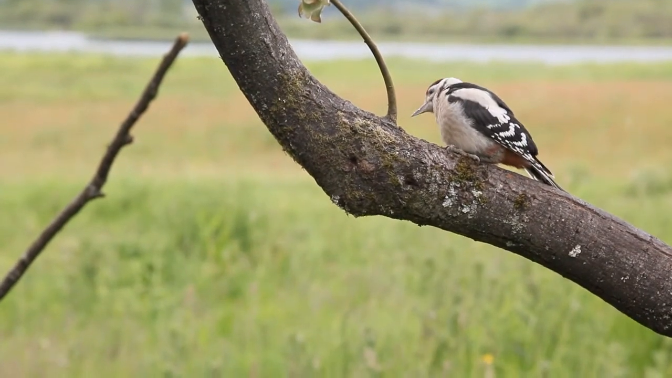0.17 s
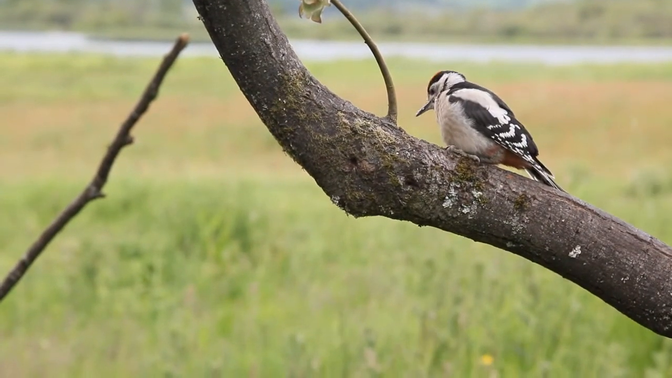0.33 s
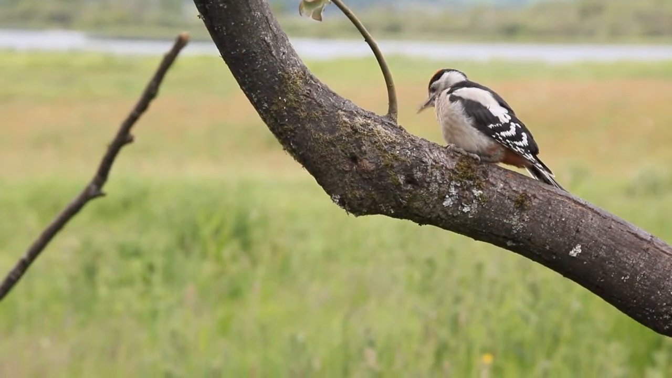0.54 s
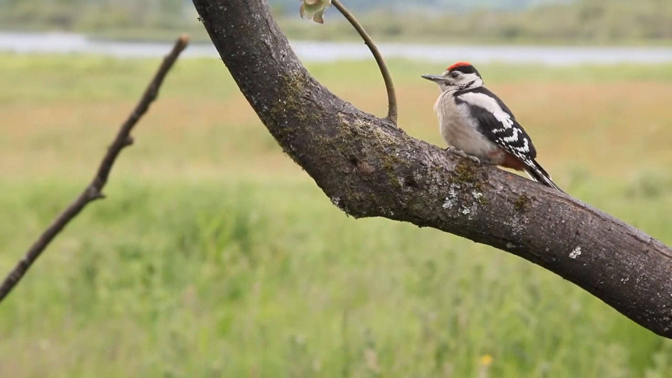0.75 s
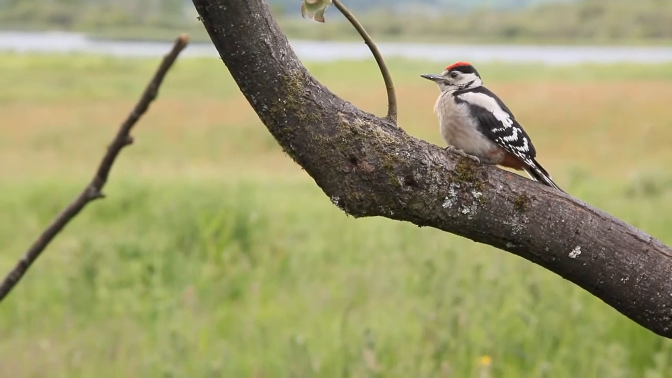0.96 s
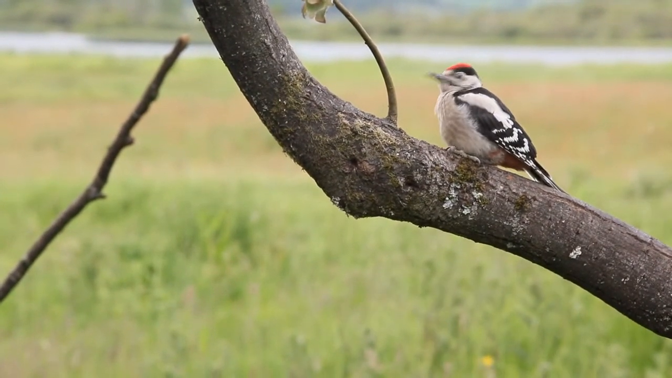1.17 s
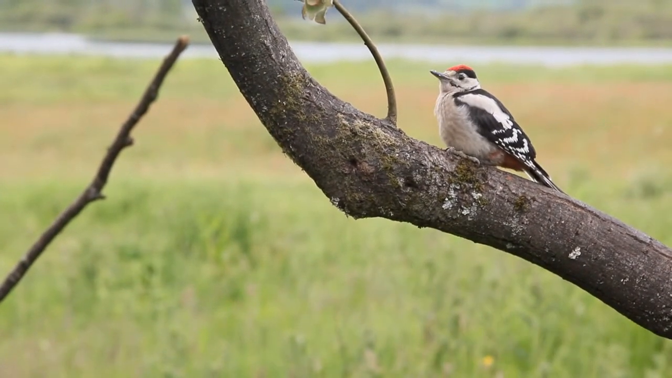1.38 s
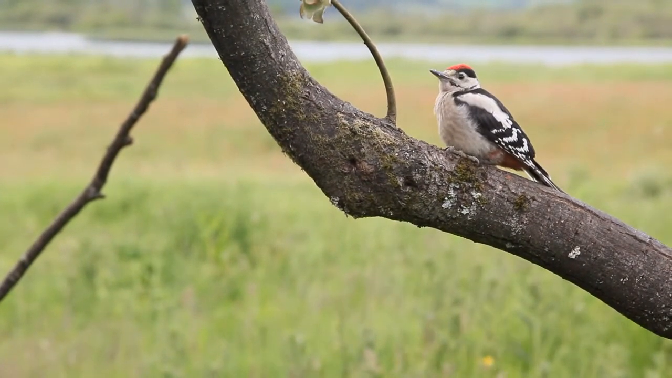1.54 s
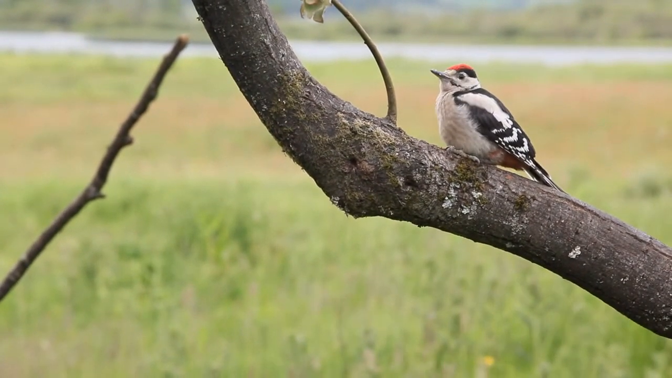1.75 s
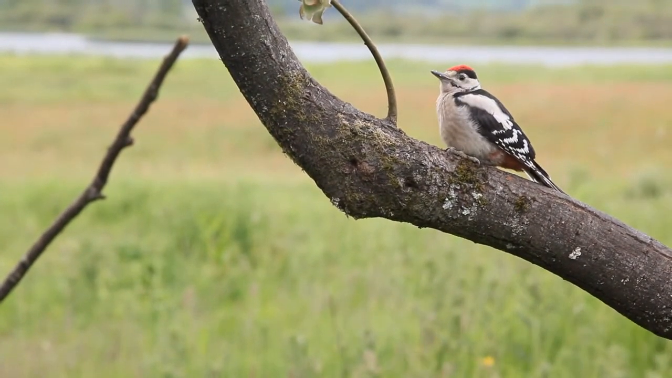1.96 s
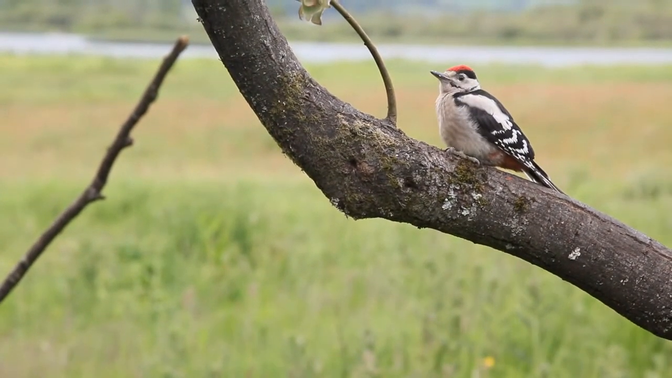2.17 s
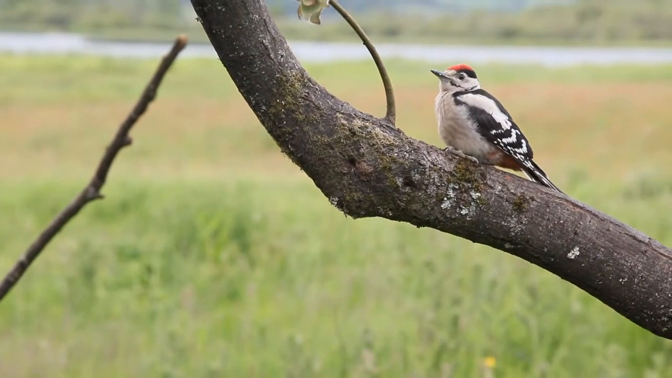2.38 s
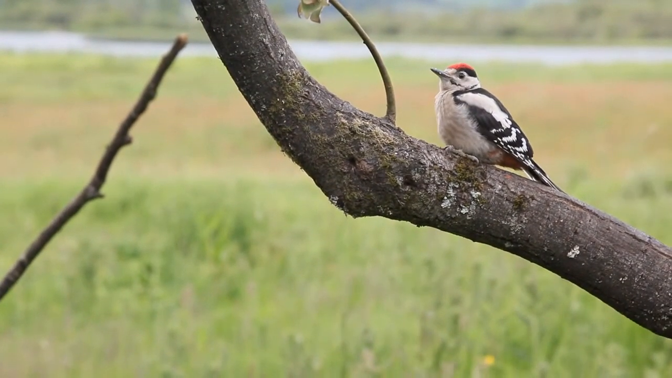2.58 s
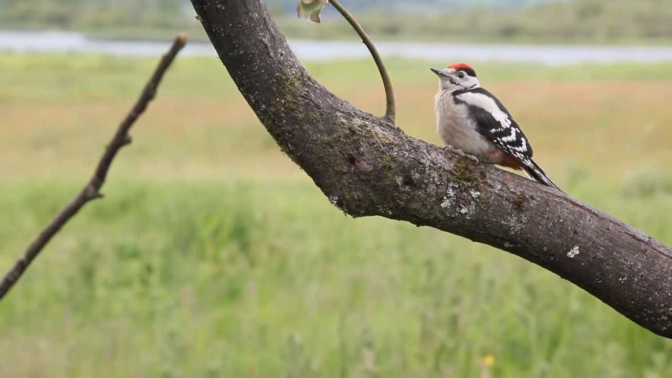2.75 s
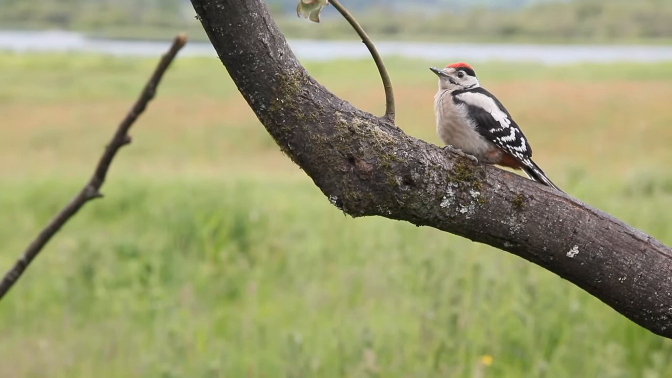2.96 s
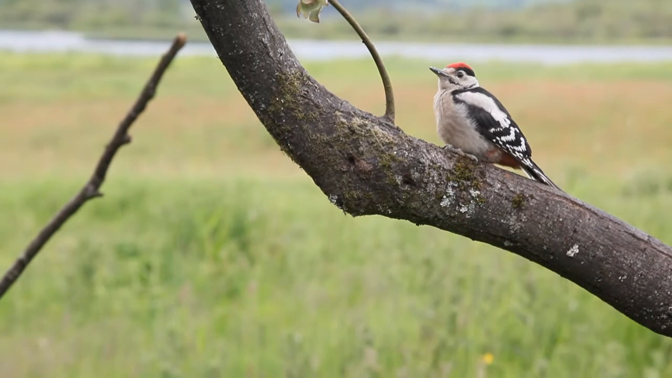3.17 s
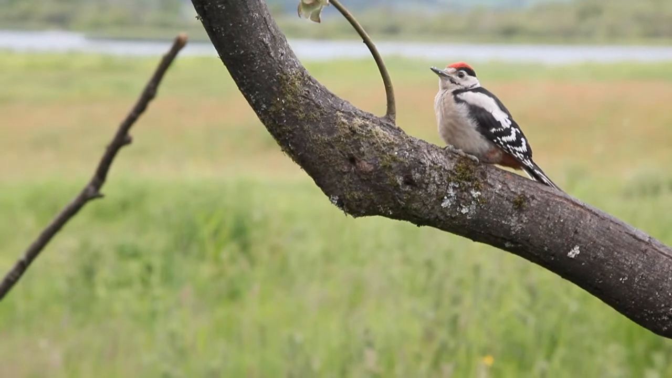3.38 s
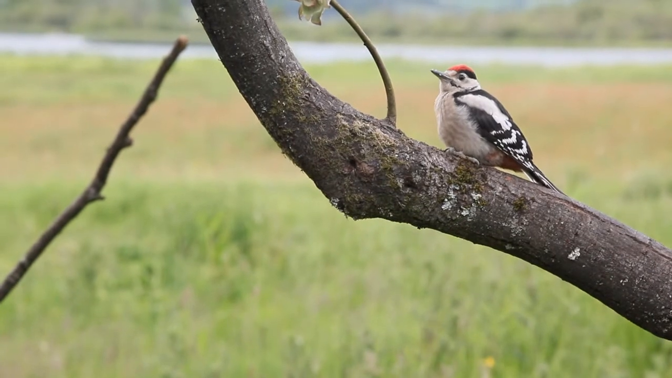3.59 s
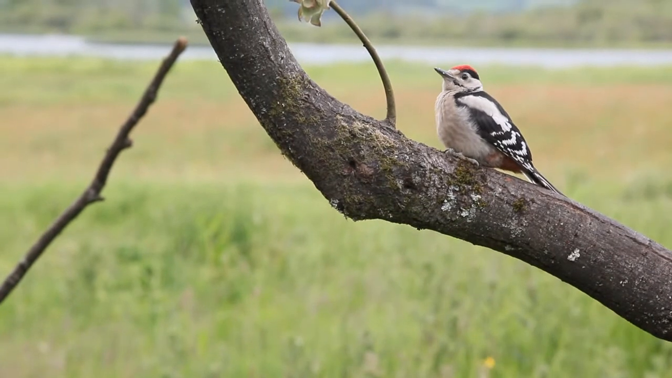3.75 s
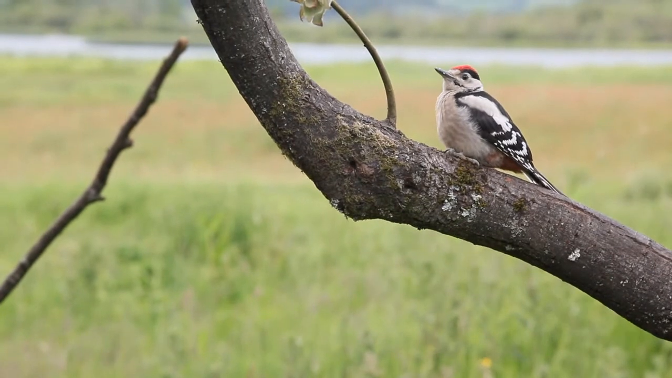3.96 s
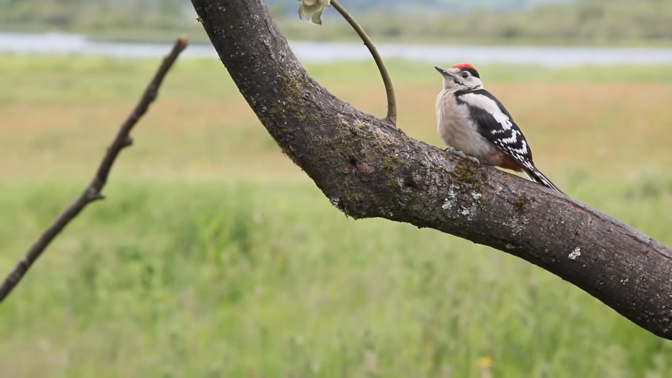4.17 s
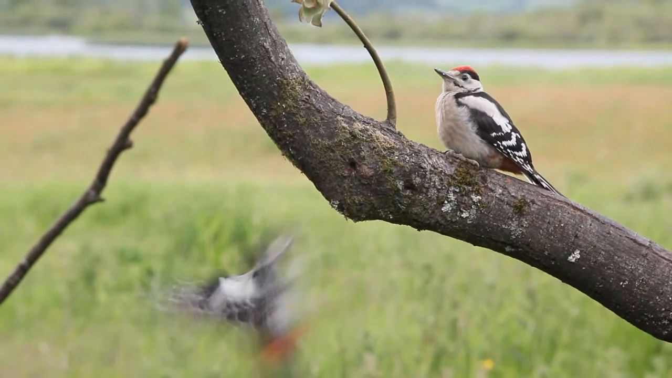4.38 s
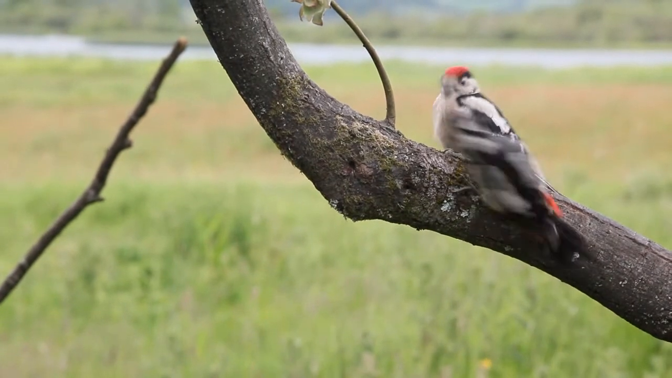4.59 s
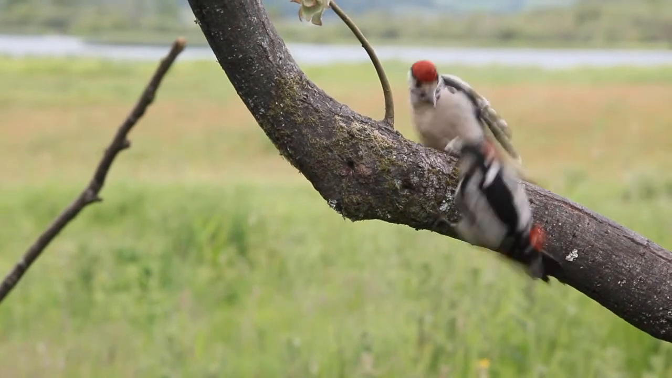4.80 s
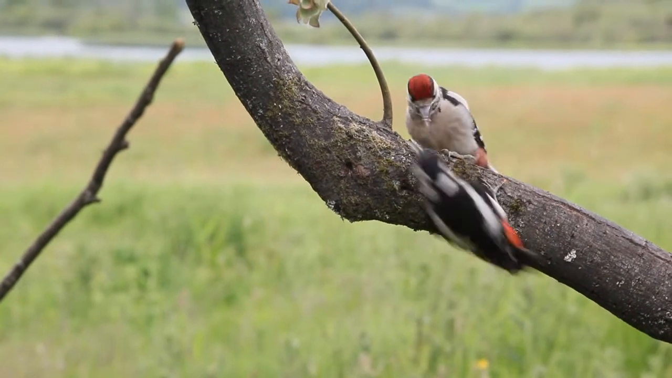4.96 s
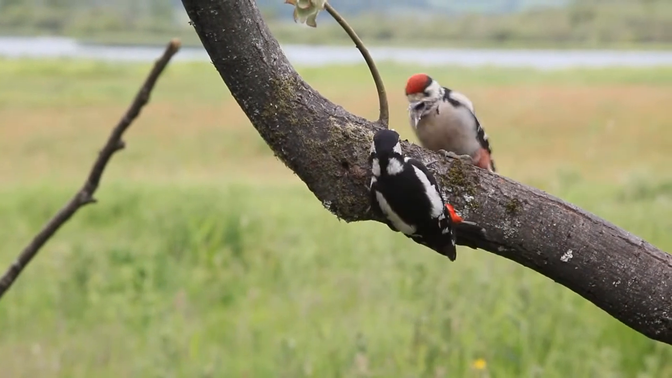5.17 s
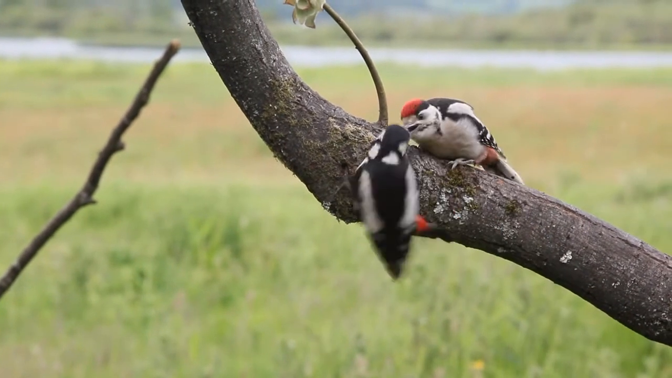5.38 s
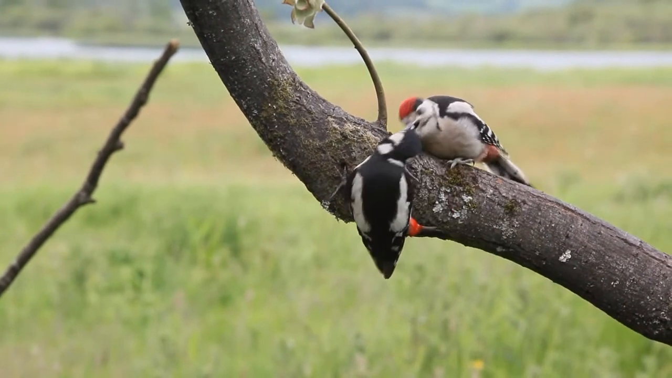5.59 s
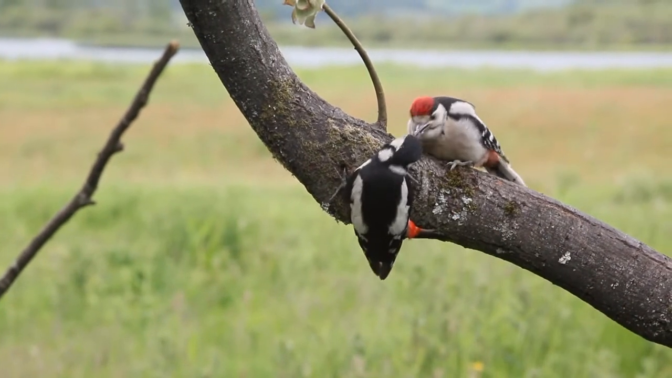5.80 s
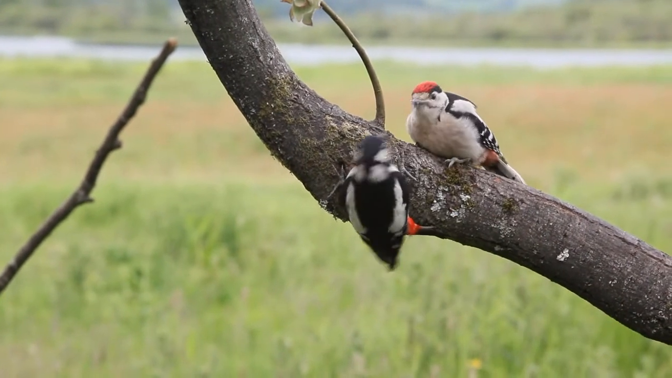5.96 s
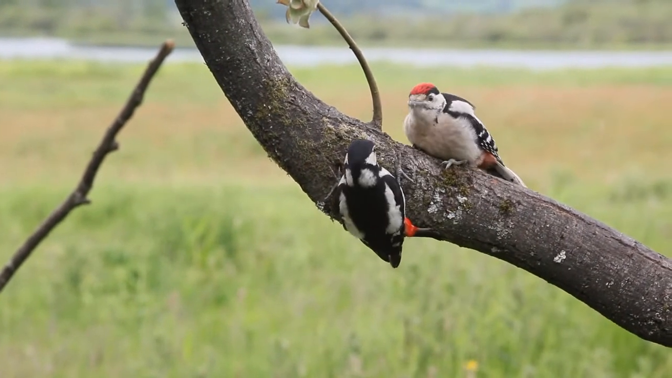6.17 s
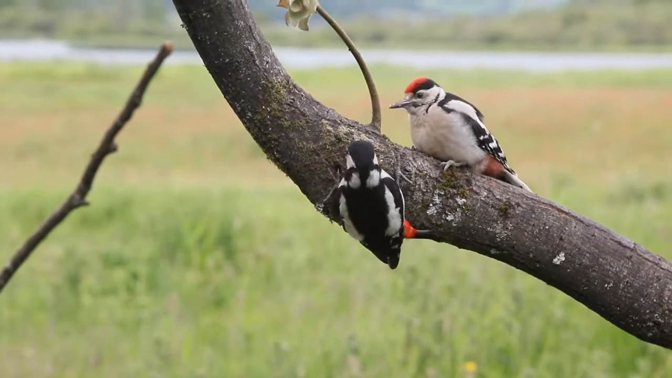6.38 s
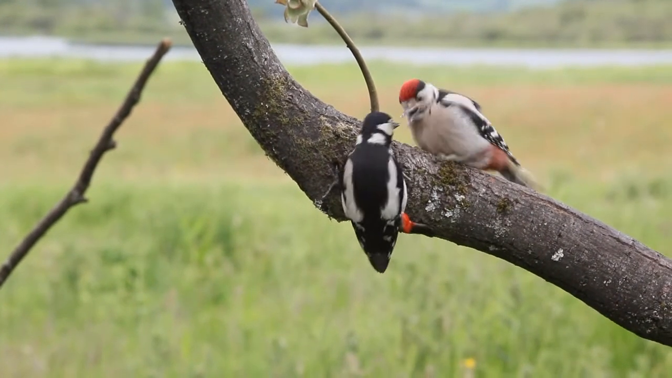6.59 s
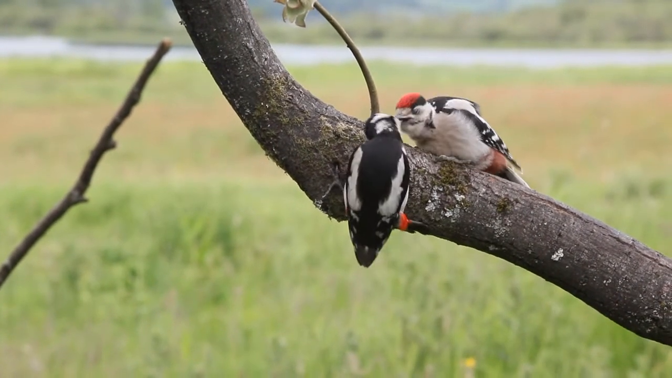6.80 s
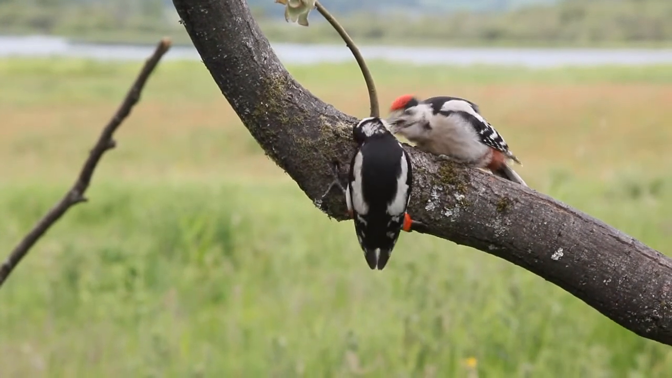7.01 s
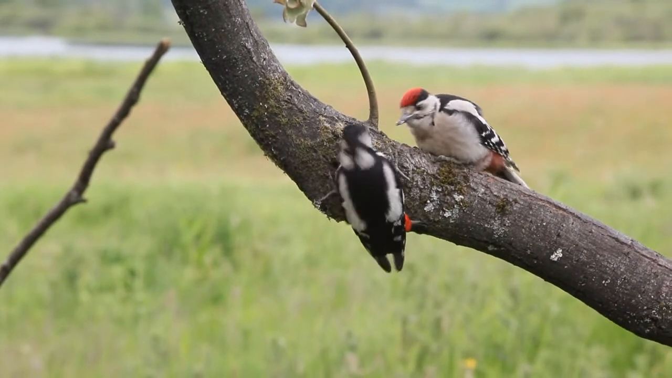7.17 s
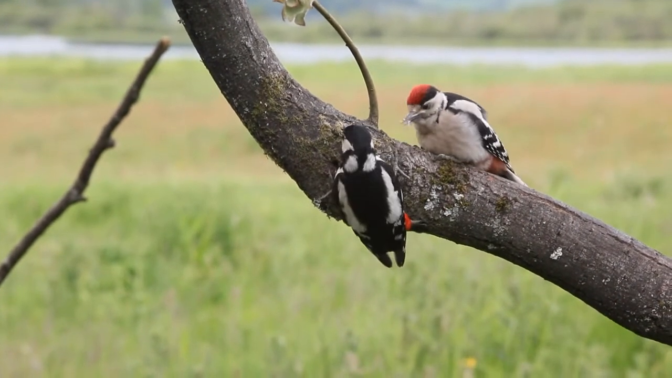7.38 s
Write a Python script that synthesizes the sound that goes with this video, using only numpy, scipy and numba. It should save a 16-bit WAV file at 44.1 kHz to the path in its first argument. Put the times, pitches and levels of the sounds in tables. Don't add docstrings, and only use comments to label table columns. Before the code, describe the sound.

An open marsh with a steady low rumble of far traffic, soft air and a barely audible high camera whine. From 0.2 s sparrows chirp close by: brief, bright, arched or falling notes with slightly hoarse endings, thin slides and breathy puffs. Claws and beak tick on bark, crisp snaps with small woody thuds, strongest around 0.5, 0.7 and 1.4 s, then sparse and faint. Chirps cluster near 2.0-2.5 s and densely at 3.7-3.9 s. At about 4.2 to 4.6 s very soft, rapid wing swishes arrive. From 4.7 s a young woodpecker begs in loud, very short squeaks that arch up and down, edged with rasp, near 4.7, 4.9, 5.2, 5.45, 5.7, 6.2, 6.6, 6.9 and 7.3 s, strongest around 6.6. The background ducks beneath them while sparrows continue more quietly.

```python
import sys
import numpy as np
from scipy import signal
from scipy.fft import rfft, irfft
from scipy.io import wavfile
from scipy.ndimage import uniform_filter1d
from numba import njit

SR = 44100
rng = np.random.default_rng(int(sys.argv[2]) if len(sys.argv) > 2 else 0)


def how_loud(loudness_db):
    steps = np.asarray(loudness_db, float) / 20
    return 10 ** steps


def digitize_waveform(pressure):
    field = np.atleast_2d(pressure).T
    bounded = np.clip(field, -1, 1)
    quanta = np.round(bounded * 32767).astype(np.int16)
    wavfile.write(sys.argv[1], SR, quanta)


N = 328104

# f/Hz, level per Hz/dB
AIR_SPECTRUM = [(15, -54), (35, 1), (120, -4.5), (317, -14.5), (775, -12.5), (1230, -16), (2350, -27.5),
                (3900, -30), (7300, -28.5), (9500, -40), (16000, -45)]
# f/Hz, width/Hz, level/dB
TRAFFIC_HUMPS = [(45, 20, 3), (114, 22, 5), (985, 120, 6)]
# t/s, rumble level/dB, road roar level/dB
TRAFFIC_DRIFT = [(0, -2.5, -1.5), (0.899, 0, -2), (2, -4, -1.5), (3.199, -5, -3), (4.502, -7, -0.5),
                 (5.999, -2.5, 0.5), (7.44, 0.5, 0.5)]

# t/s, peak level/dB, wood thud minus peak/dB
TICKS = [(0.1811, -26, 1.5), (0.323, -26.5, -2), (0.4884, -16.5, -5), (0.7138, -37, -17),
         (0.7262, -16.5, 4.5), (0.762, -31.5, -11), (1.1605, -32.5, 3), (1.3811, -19, -4),
         (2.81, -33.5, -3), (3.0657, -37, 0), (3.914, -24, -17), (3.9457, -24.5, -6), (4.1373, -33.5, -18),
         (4.484, -42, -8), (4.556, -31, -10), (5.409, -50, -20), (5.881, -42.5, -20), (7.1427, -40, -13)]
# f/Hz, width/Hz, level/dB
BARK_THUD = [(760, 500, 12), (1350, 2500, 26), (2900, 220, 6)]
# f/Hz, width/Hz, level/dB
BARK_SNAP = [(4500, 780, 17.5), (6030, 680, 19.5), (7680, 1230, 24.5), (11600, 3300, 15)]

# start t/s, length/s, centre f/Hz, width/Hz, level/dB
PUFFS = [(0.172, .11, 6500, 1998, -48), (0.259, 0.051, 4700, 2300, -45.5),
         (0.337, 0.075, 6330, 2000, -52.5), (0.524, .03, 5200, 1200, -48), (1.222, 0.048, 5700, 1800, -55),
         (1.4, .025, 5400, 1500, -44), (1.456, 0.033, 5300, 900, -50), (1.824, .055, 4500, 1230, -46),
         (1.889, .053, 5000, 2296, -57), (2.183, .04, 2380, 300, -55), (2.184, 0.079, 6960, 1190, -45.5),
         (2.186, .04, 4770, 550, -49.5), (2.248, .038, 5400, 1620, -37), (2.8, 0.017, 4800, 700, -52.5),
         (2.323, .06, 5700, 500, -46.5), (2.395, 0.085, 7460, 600, -56.5), (2.52, 0.05, 6200, 1500, -52),
         (2.996, 0.027, 5430, 2000, -42.5), (3.3, 0.047, 4960, 1100, -50), (3.152, 0.11, 7130, 600, -60.5),
         (3.342, 0.036, 5900, 1487, -47), (3.723, .1, 4860, 1934, -43), (3.771, .11, 6700, 2000, -43),
         (3.909, 0.024, 6900, 3000, -43), (3.95, 0.067, 6930, 450, -49.5), (3.951, 0.053, 2330, 300, -56),
         (3.952, .065, 4670, 300, -48.5), (4.134, .06, 7560, 800, -59), (3.6, 0.057, 4800, 1800, -51),
         (4.258, .05, 7150, 500, -51), (4.31, 0.017, 6800, 3500, -45.5), (4.37, .08, 7000, 2500, -54),
         (4.9, .08, 6900, 900, -57), (4.615, 0.029, 5950, 4500, -40), (5.585, 0.027, 5330, 900, -40),
         (5.1, 0.023, 4968, 700, -40.5), (5.963, 0.03, 5900, 2000, -55), (6.446, 0.047, 5350, 1400, -48.5),
         (7.205, 0.094, 5400, 1620, -47.5), (7.274, 0.059, 3200, 900, -38)]
# start t/s, length/s, from f/Hz, to f/Hz, level/dB
SLIDES = [(.15, 0.064, 3910, 4240, -45), (1.921, 0.068, 2500, 2900, -43), (2.054, .088, 2800, 4360, -34.5),
          (2.059, 0.067, 1950, 2480, -42), (2.068, 0.053, 4000, 4960, -45.5),
          (2.09, 0.035, 5700, 6700, -60), (2.323, 0.025, 2360, 2950, -34.5), (3.487, .019, 2790, 3440, -46),
          (3.563, 0.02, 2930, 4540, -50), (3.628, 0.022, 3000, 3770, -54), (3.717, .016, 4600, 4700, -43),
          (3.72, 0.019, 5350, 5500, -33), (3.746, 0.048, 3400, 2300, -39.5),
          (3.792, 0.028, 2300, 3050, -37), (3.8, .02, 4100, 4500, -41), (3.803, .02, 4700, 5000, -33),
          (3.836, 0.029, 3950, 3270, -22), (5.811, 0.024, 4750, 4400, -34),
          (5.823, 0.034, 3900, 3270, -32.5), (7.018, 0.061, 3850, 3270, -26), (7.218, .02, 5400, 5350, -40)]
# jump t/s, length/s, top f/Hz, end f/Hz, level/dB
CHEEPS = [(0.291, 0.044, 4220, 4270, -32), (0.545, 0.054, 4500, 3620, -25), (1.167, 0.054, 4250, 3650, -30),
          (1.847, 0.039, 4410, 4370, -35), (2.258, 0.058, 4104, 3200, -24.5),
          (3.366, 0.041, 5010, 4500, -28), (3.727, .056, 3970, 3320, -24.5),
          (3.812, 0.026, 4750, 4200, -26), (3.853, .05, 4300, 3726, -23), (5.279, 0.036, 4060, 3600, -37.5),
          (5.597, 0.056, 4500, 3315, -29.5), (5.808, 0.033, 4150, 3840, -37),
          (6.505, 0.044, 4150, 4010, -30), (6.946, 0.053, 4190, 3665, -29), (7.23, 0.04, 4200, 3694, -27)]
# start t/s, length/s, top f/Hz, level/dB, hoarseness/0-1
HUMPS = [(0.332, 0.043, 3450, -23.5, 0.48), (0.6, 0.028, 3150, -27, 0.35),
         (1.221, 0.026, 3230, -31.5, 0.28), (1.89, 0.033, 3470, -29, 0.58), (2.343, 0.04, 3115, -31, 0.85),
         (3.417, 0.043, 4010, -30, 0.64), (3.812, 0.033, 3120, -24, 0.48), (3.834, 0.021, 2380, -42, .4),
         (3.864, 0.025, 3130, -29.5, 0.48), (3.904, 0.038, 3185, -24.5, 0.45),
         (5.323, 0.028, 3230, -37.5, 0.32), (5.659, 0.056, 3450, -34, 0.52),
         (5.855, 0.02, 3300, -37.5, 0.43), (6.551, 0.035, 3310, -23.5, 0.36), (6.919, 0.031, 4000, -33, .5),
         (6.997, 0.033, 3240, -30, 0.38), (7.07, 0.032, 3180, -33, 0.45)]
# t/s, f/Hz, level/dB, overtone level/dB
NEAR_CALL = [
    (-.04, 1900, -44, 12),
    (-.018, 2050, -33, 13),
    (-.006, 2550, -31, 15),
    (-.003, 2750, -27, -6),
    (0, 3250, -12, -18),
    (.007, 3750, -4.5, -30),
    (.02, 3950, -4, -38),
    (.037, 3520, 0, -30),
    (.048, 3340, -2, -28),
    (.052, 2450, -9, -24),
]
# start t/s, length up to the break/s, pitch factor, level/dB, ending level/dB
NEAR_REPEATS = [(0.202, 0.06, .97, -31.5, -5), (1.239, 0.061, 0.99, -25, -10),
                (1.421, 0.044, 1.003, -26.5, -2), (1.956, 0.055, 0.99, -24, -8),
                (2.543, 0.053, 1.017, -24.5, -5), (2.999, 0.046, 1.003, -27.5, -3),
                (3.365, 0.056, 0.99, -26.5, -8), (4.196, .055, 0.992, -27.5, -5),
                (5.132, 0.053, 0.95, -30.5, -31.5), (5.985, 0.053, 1.016, -31, -7.5),
                (6.477, 0.046, 0.99, -30, 0)]

# start t/s, length/s, top f/Hz, level/dB, place of the top/0-1
ARCHES = [(4.694, 0.056, 2630, -22, 0.4), (4.758, 0.034, 2375, -26.5, 0.45),
          (4.929, 0.055, 2640, -23, 0.43), (5.174, 0.052, 2750, -20.5, 0.52),
          (5.251, 0.027, 2508, -25.5, 0.45), (5.449, 0.047, 2647, -19, 0.6),
          (5.715, 0.046, 2628, -19.5, 0.49), (6.225, 0.031, 2544, -21.5, 0.4),
          (6.579, 0.036, 2680, -16, 0.6), (6.655, 0.025, 2382, -19, 0.6), (6.876, 0.044, 2496, -17, 0.5),
          (7.288, 0.037, 2395, -20, 0.43)]
# start t/s, length/s, f/Hz, level/dB, roughness/0-1
RASPS = [(4.683, 0.012, 1252, -21, 0.6), (4.693, 0.011, 1350, -25, 0.67), (4.746, 0.029, 1575, -35.5, 0.57),
         (4.783, 0.019, 1500, -39, 0.65), (4.913, 0.04, 1506, -36.5, 0.6),
         (4.972, 0.018, 1636, -32.5, 0.47), (4.984, 0.027, 1340, -49, .9), (5.159, 0.036, 1710, -32, 0.47),
         (5.213, 0.081, 1880, -33.5, 0.6), (5.274, 0.018, 1450, -37, 0.24),
         (5.433, 0.039, 1565, -34.5, 0.7), (5.487, 0.024, 1602, -30.5, 0.7),
         (5.699, 0.035, 1433, -35.5, 0.9), (5.754, 0.022, 1350, -38, 0.63),
         (6.221, 0.012, 1377, -40.5, 0.95), (6.247, 0.018, 1496, -33.5, 0.46),
         (6.57, 0.024, 1570, -44, 0.7), (6.612, 0.013, 1500, -26, 0.3), (6.621, 0.063, 1984, -34, 0.5),
         (6.67, 0.029, 1574, -35, 0.27), (6.858, 0.047, 1436, -35.5, 0.5), (6.918, 0.016, 1290, -35, 0.46),
         (7.32, 0.01, 1480, -40, 0.5)]
# t/s, level above 9 kHz/dB, mid-call overtone level/dB,
# level change across a call/dB
FACING = [(4.7, -2, 7, -6.5), (4.77, 1, 10, -12), (4.94, 2.5, 6.5, -11), (5.18, 5, 8.5, -7.5),
          (5.26, -1, 11, -3), (5.45, -5.5, -0.5, -4.5), (5.72, -17.5, 8.5, -16.5), (6.231, 0, 0, -1),
          (6.58, -1, 3.5, 0.5), (6.66, -4.5, 2.5, -3), (6.88, 0.5, -5, -3.5), (7.29, -11, -15, -7.5)]
# f/Hz, level/dB
THROAT = [(1200, -10.5), (2600, -16), (4000, -2.5), (5300, -8.5), (6500, 2), (7600, 0.5), (8400, -13.5),
          (9500, -21.5), (12000, -30.5), (15500, -42.5)]

LEAD_S, LEAD_HZ, LEAD_DB, JUMP_S, JUMP_DB = 0.018, 2450, -19.5, 0.014, -5
FALL_S, FALL_DB = 0.0129, -16
OVERTONES_DB = -31
HUMP_START, HUMP_END, HUMP_CREST = 0.8, 0.84, 0.35
FOOT, RISE_BEND, DROP_BEND = 0.45, 3.0, 2.4


def wobble(n, rate_hz):
    k = max(int(SR / rate_hz), 1)
    v = rng.standard_normal(n + 2 * k)
    v = uniform_filter1d(uniform_filter1d(v, k), k)[k:k + n]
    return v * np.sqrt(1.5 * k)


def on_log(hz, table):
    t = np.array(table, float)
    return np.interp(np.log(np.maximum(hz, 1)), np.log(t[:, 0]), t[:, 1])


def ring(x, hz, width):
    return signal.lfilter(*signal.iirpeak(hz, hz / width, fs=SR), x)


def fade(n, rise_s, fall_s):
    t = np.arange(n) / SR
    return np.clip(t / rise_s, 0, 1) * np.clip(t[::-1] / fall_s, 0, 1)


def add(out, s, piece):
    i = int(s * SR)
    out[i:i + len(piece)] += piece[:N - i]


def echoes(x, t60, wet_db, delay_s):
    t = np.arange(int(0.6 * SR)) / SR
    tail = rng.standard_normal(len(t)) * how_loud(-60 * t / t60) * np.clip(t / delay_s, 0, 1)
    leaves = signal.butter(2, 8500, fs=SR, output="sos")
    tail = signal.sosfilt(leaves, tail)
    tail /= np.sqrt(np.sum(tail ** 2))
    return x + how_loud(wet_db) * signal.fftconvolve(x, tail)[:N]


def marsh():
    hz, t = np.fft.rfftfreq(N, 1 / SR), np.arange(N) / SR
    noise = rfft(rng.standard_normal(N)) * how_loud(on_log(hz, AIR_SPECTRUM)) * (hz > 18)
    noise *= how_loud(sum(db * np.exp(-((hz - f) / width) ** 2) for f, width, db in TRAFFIC_HUMPS))
    noise *= how_loud(-39) / np.std(irfft(noise, N))

    drift_s, rumble_db, roar_db = np.transpose(TRAFFIC_DRIFT)
    octave = np.log2(np.maximum(hz, 20) / 20)
    out = 0
    for centre in np.arange(0, 11.0):
        low = np.clip(2 - centre / 3.32, 0, 1)
        db = np.interp(t, drift_s, low * rumble_db + (1 - low) * roar_db) + 1.1 * wobble(N, 4)
        band = np.clip(1 - np.abs(octave - centre), 0, 1)
        out = out + how_loud(db) * irfft(noise * band, N)

    whine = np.sin(2 * np.pi * 10800 * t + 1.5 * wobble(N, 16))
    return out + how_loud(-75) * np.sqrt(2) * whine


def wings():
    start_s, beats_per_s, stroke_s, level_db = 4.218, 23, 0.022, -54
    centre_hz, width_hz = 6400, 6100
    out, n = np.zeros(N), int(stroke_s * SR)
    for beat in range(9):
        swish = ring(rng.standard_normal(n), centre_hz, width_hz)
        swish = ring(swish, centre_hz, width_hz)
        db = level_db - 0.63 * beat + 1.3 * rng.standard_normal()
        stroke = how_loud(db) * np.hanning(n) ** 0.5 * swish / np.std(swish)
        add(out, start_s + beat / beats_per_s, stroke)
    return out


def ticks():
    out, t = np.zeros(N), np.arange(1200) / SR
    for s, db, thud_db in TICKS:
        scrape = rng.standard_normal(len(t)) * np.exp(-t / 0.001)
        for body, more_db in ((BARK_SNAP, 0), (BARK_THUD, thud_db - 4.5)):
            sound = np.zeros(len(t))
            for hz, width, gain_db in body:
                sound += how_loud(gain_db) * ring(ring(scrape, hz, width), hz, width) * 1000 / width
            add(out, s, how_loud(db + more_db) * sound / np.abs(sound).max())
    return echoes(out, 0.06, -12, 0.003)


def whistle(hz, db, over_db, rough):
    n = len(hz)
    pitch = uniform_filter1d(hz, 90, mode="nearest")
    phase = 2 * np.pi * np.cumsum(pitch * (1 + 0.09 * rough * wobble(n, 325))) / SR
    second = wobble(n, 610) * np.sin(2 * phase)
    third = np.interp(pitch, [2400, 3000], [0.6, 0.12]) * wobble(n, 1240) * np.sin(3 * phase)
    breath = how_loud(-21.0 + 7.9 * rough) * wobble(n, 2900) * np.sin(1.1 * phase)
    tone = np.sin(phase) + how_loud(over_db) * (second + third) + breath
    flutter = np.clip(1 - rough, 0, 1) + 1.14 * rough * wobble(n, 436)
    return np.sqrt(2) * how_loud(db) * fade(n, 0.0013, 0.0018) * flutter * tone


def cheep(length, top_hz, end_hz, db):
    t = np.arange(-LEAD_S, length + FALL_S, 1 / SR)
    jump = np.sin(np.pi / 2 * np.clip(t / JUMP_S, 0, 1))
    sag = np.clip((t - JUMP_S) / (length - JUMP_S), 0, 1) ** 0.8
    fall = np.clip((t - length) / FALL_S, 0, 1)
    hz = LEAD_HZ + (1 - fall) * (jump * (top_hz - LEAD_HZ) + sag * (end_hz - top_hz))

    swell_s = [-LEAD_S, 0, JUMP_S, 0.5 * (length + JUMP_S)]
    swell_db = np.interp(t, swell_s, [LEAD_DB - 19.5, LEAD_DB, JUMP_DB, 0])
    level_db = db + FALL_DB * np.sqrt(fall) + swell_db
    twin = jump * (1 - fall) * whistle(1.14 * hz, level_db - 8, OVERTONES_DB, 0.5)
    return whistle(hz, level_db, OVERTONES_DB, 0.28) + twin


def hump(length, top_hz, db, rough, end):
    u = np.linspace(0, 1, int(length * SR))
    feet = [np.sqrt(1 - min(HUMP_START, 1)), 0, np.sqrt(1 - min(end, 1))]
    drop = np.interp(u, [0, HUMP_CREST, 1], feet) ** 2
    attack_db = -24 * np.clip(1 - u / 0.14, 0, 1)
    return whistle(top_hz * (1 - drop), db - 6 * u ** 2 + attack_db, OVERTONES_DB, rough)


def slide(length, from_hz, to_hz, db):
    u = np.linspace(0, 1, int(length * SR))
    swell_db = -13 * np.interp(u, [0, 0.92, 1], [1, 0, 1]) ** 2
    hz = from_hz + (to_hz - from_hz) * np.sin(np.pi * u / 2) ** 2
    return whistle(hz, db + swell_db, -40, 0.082)


def puff(length, centre_hz, width, db):
    n = int(length * SR)
    hiss = rng.standard_normal(n)
    for _ in range(3):
        hiss = ring(hiss, centre_hz, width)
    level = how_loud(db + 3 * wobble(n, 74))
    return level * fade(n, 0.15 * length, 0.2 * length) * hiss / np.std(hiss)


def nearest_sparrow(out):
    rise_s, break_s = 0.008, 0.05
    s, hz, db, over_db = np.transpose(NEAR_CALL)
    for start, length, factor, call_db, end_db in NEAR_REPEATS:
        when = s + np.clip((s - rise_s) / (break_s - rise_s), 0, 1) * (length - break_s)
        t = np.arange(when[0], when[-1], 1 / SR)
        pitch = factor * np.interp(t, when, hz)
        level_db = call_db + np.interp(t, when, db)
        rough = 0.08 + 0.7 * (t < 0)
        add(out, start + when[0], whistle(pitch, level_db, np.interp(t, when, over_db), rough))
        add(out, start + length, hump(0.034, factor * 2920, call_db + end_db, 0.27, 0.74))


def sparrows():
    out = np.zeros(N)
    for start, *note in CHEEPS:
        add(out, start - LEAD_S, cheep(*note))
    for start, *note in HUMPS:
        add(out, start, hump(*note, HUMP_END))
    nearest_sparrow(out)
    for start, *breath in PUFFS:
        add(out, start, puff(*breath))
    near = echoes(out, 0.075, -9, 0.003)
    for start, *note in SLIDES:
        add(near, start, slide(*note))
    return echoes(near, 0.39, -20.5, 0.017)


def voice(hz, rough, overtone_db):
    n = len(hz)
    phase = 2 * np.pi * np.cumsum(hz * (1 + 0.098 * rough * wobble(n, 730))) / SR
    out = np.zeros(n)
    for k in range(1, 12):
        gain_db = on_log(k * hz, THROAT) + overtone_db * np.clip((k - 1) / 2, 0, 1.5)
        gain = how_loud(gain_db) * (k * hz < 16000)
        rough_k = rough * min(k / 3, 1)
        flutter = 1 - rough_k + rough_k * wobble(n, 1500)
        out += gain * flutter * np.sin(k * phase + 2 * np.pi * rng.random())
    return out * np.sqrt(2)


def arch(length, top_hz, db, crest, overtone_db, tire_db):
    u = np.linspace(0, 1, int(length * SR))
    off = np.interp(u, [0, np.clip(crest, 0.1, 0.9), 1], [-1, 0, 1])
    bend = np.where(off < 0, RISE_BEND, DROP_BEND)
    hz = top_hz * (FOOT + (1 - FOOT) * (1 - np.abs(off) ** bend) ** 0.78)
    middle_db = overtone_db * np.clip((u - 0.15) / 0.19, 0, 1) * np.clip((1 - u) / 0.19, 0.3, 1)
    rough = 0.045 + 0.4 * np.abs(off) ** 5
    level = how_loud(db + tire_db * (u - 0.5)) * fade(len(u), 0.0065, 0.005)
    return level * how_loud(2.4 * wobble(len(u), 210)) * voice(hz, rough, middle_db)


def rasp(length, hz, db, rough):
    n = int(length * SR)
    pitch = hz * (1 + 0.07 * wobble(n, 151))
    level = how_loud(db + 4.5) * fade(n, 0.0007, 0.5 * length)
    return level * voice(pitch, np.clip(1.26 * rough, 0, 1), 0.6)


def woodpecker():
    out = np.zeros(N)
    turn_s, top_db, turn_db, tire_db = np.transpose(FACING)
    for s, *call in ARCHES:
        add(out, s, arch(*call, np.interp(s, turn_s, turn_db), np.interp(s, turn_s, tire_db)))
    for s, *scrap in RASPS:
        add(out, s, rasp(*scrap))
    out = signal.sosfilt(signal.butter(4, 880, "high", fs=SR, output="sos"), out)
    top = signal.sosfiltfilt(signal.butter(6, 9000, "high", fs=SR, output="sos"), out)
    out = out + (how_loud(np.interp(np.arange(N) / SR, turn_s, top_db)) - 1) * top
    return echoes(out, 0.23, -21.0, 0.0014)


@njit
def follow(x, attack, release):
    e, y = 0., np.empty(len(x))
    for i in range(len(x)):
        e += (x[i] - e) * (attack if x[i] > e else release)
        y[i] = e
    return y


def scene():
    near = woodpecker()
    attack_s, release_s = 0.0023, 0.9
    loud = follow(np.abs(near), 1 / (attack_s * SR), 1 / (release_s * SR))
    gain = np.minimum(1, (0.049 / (loud + 1e-9)) ** 0.82)
    mix = near + sparrows() + ticks() + wings() + gain * marsh()
    return mix[None]


def low_pass(x):
    return signal.sosfilt(signal.butter(12, 16450, fs=SR, output="sos"), x)


def record(dry):
    ceiling, top_hz = 0.9, 15850
    rounded = ceiling * np.tanh(dry / ceiling)
    cut = signal.sosfilt(signal.ellip(10, 0.2, 80, top_hz, fs=SR, output="sos"), rounded)
    return low_pass(cut)


dry = scene()
out = record(dry)
digitize_waveform(out)
```